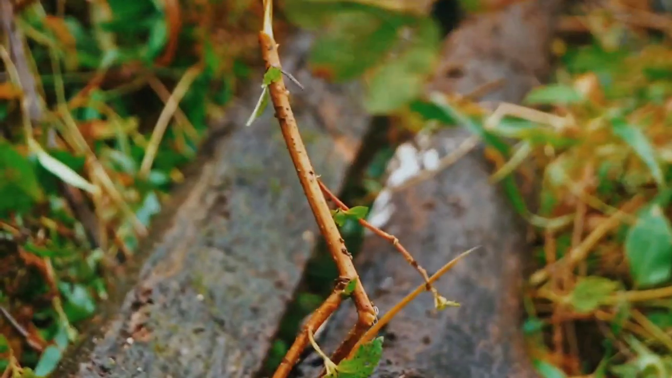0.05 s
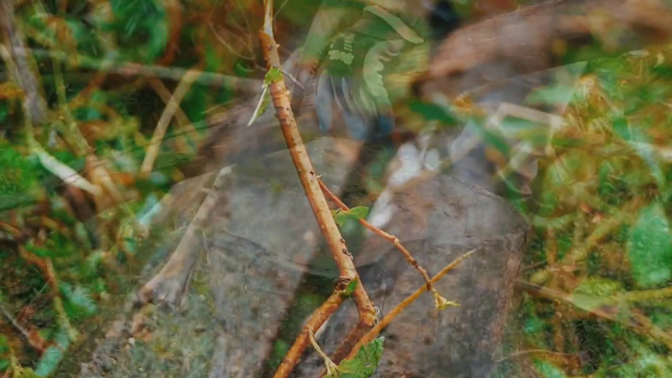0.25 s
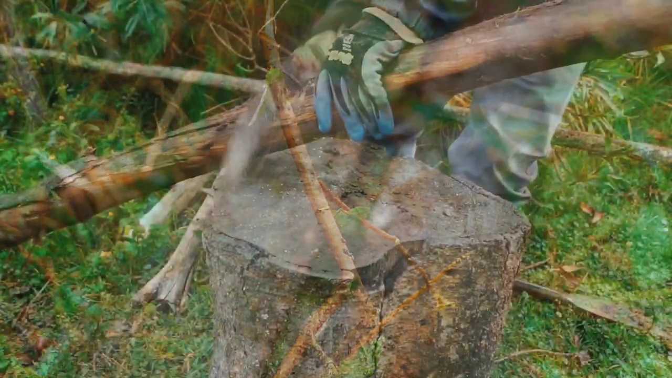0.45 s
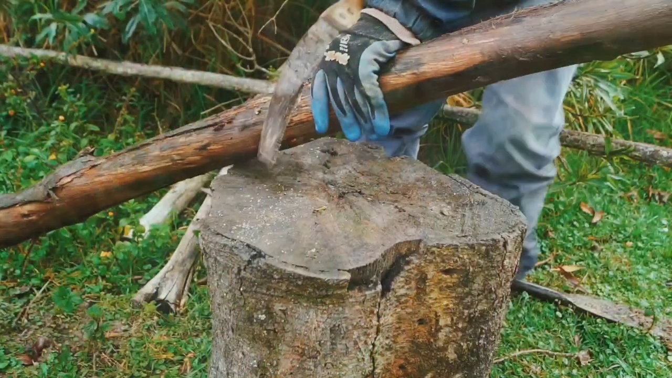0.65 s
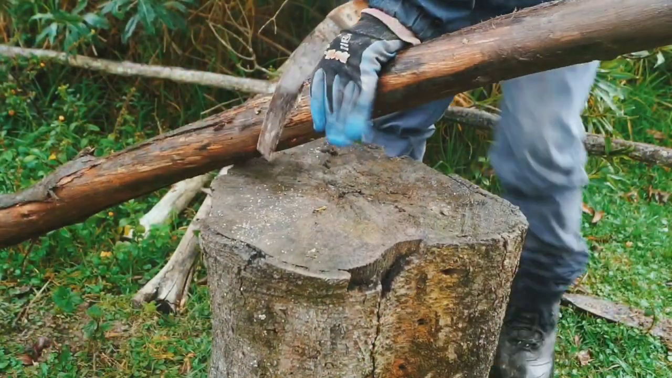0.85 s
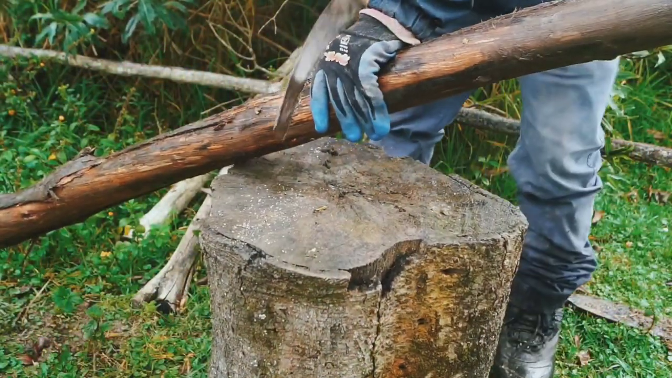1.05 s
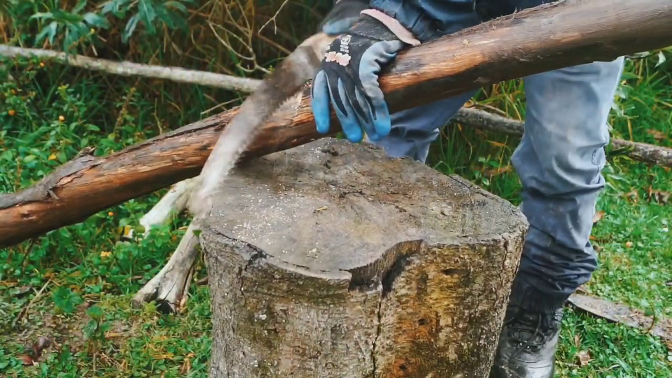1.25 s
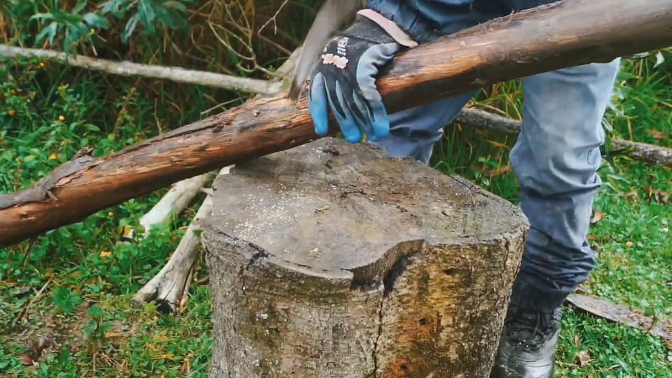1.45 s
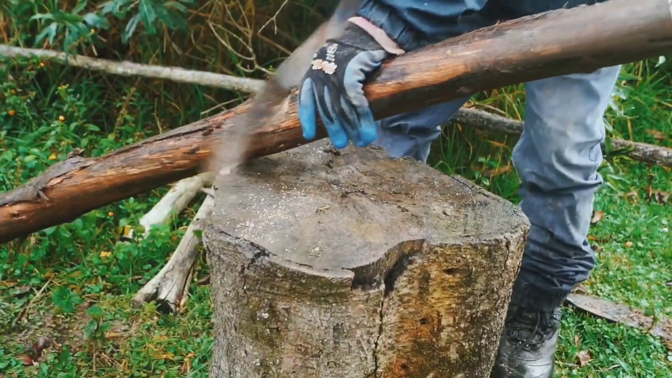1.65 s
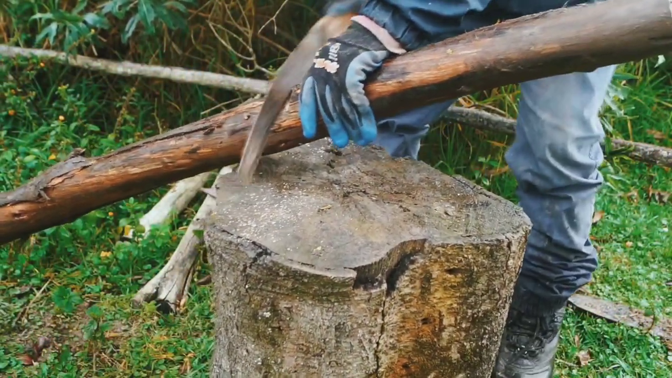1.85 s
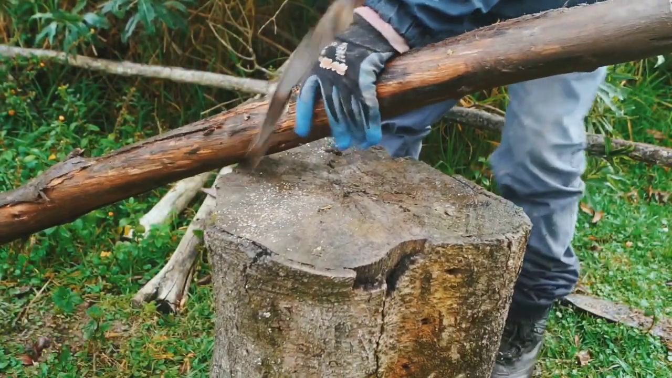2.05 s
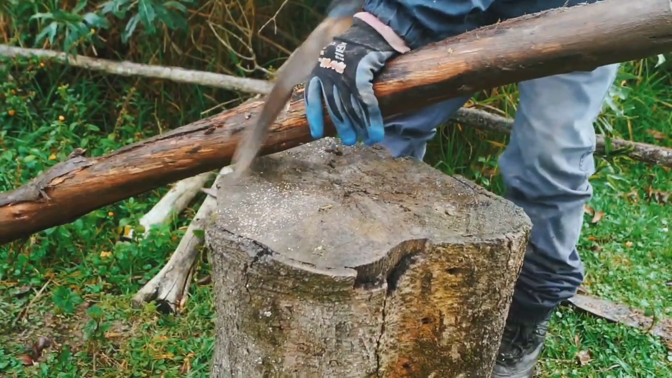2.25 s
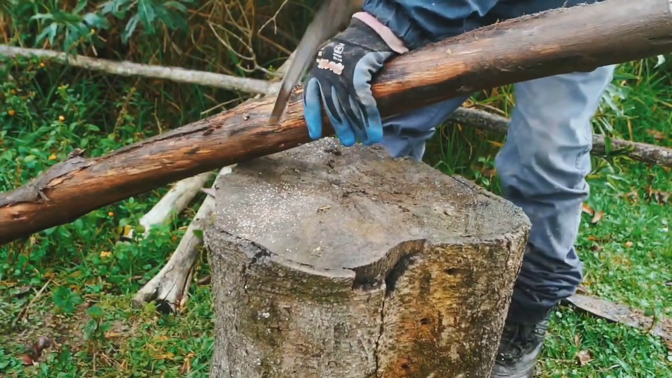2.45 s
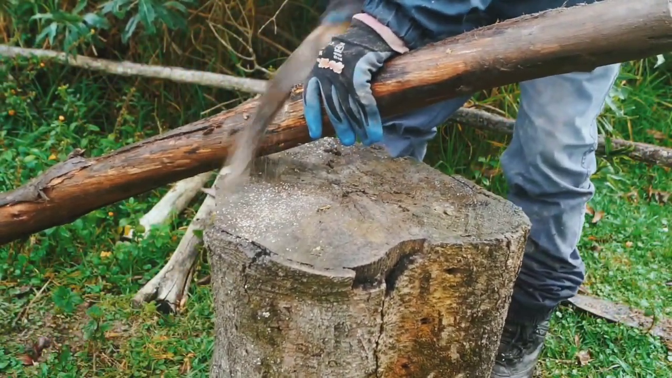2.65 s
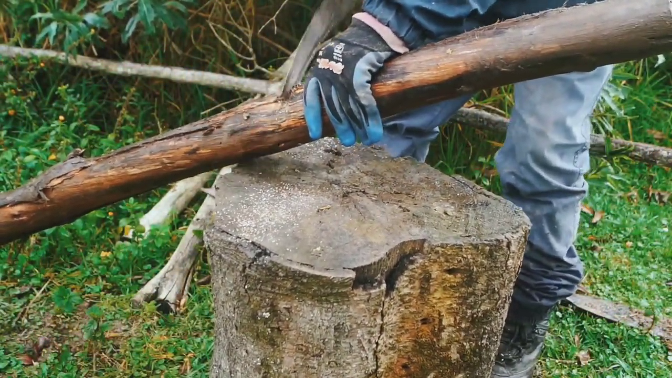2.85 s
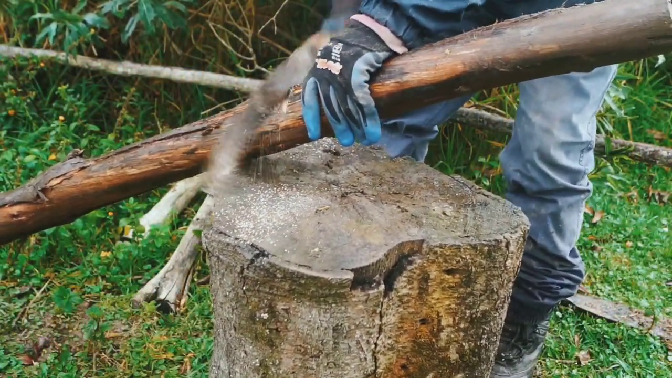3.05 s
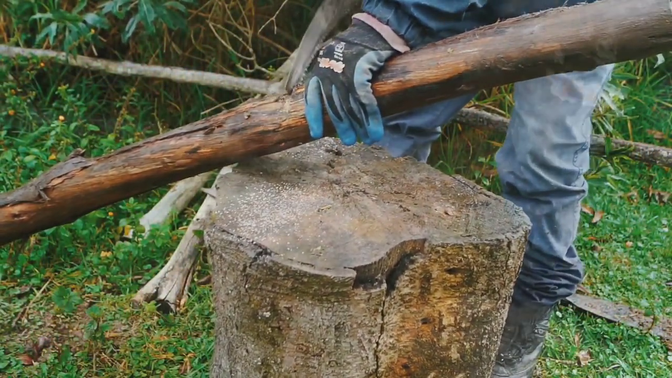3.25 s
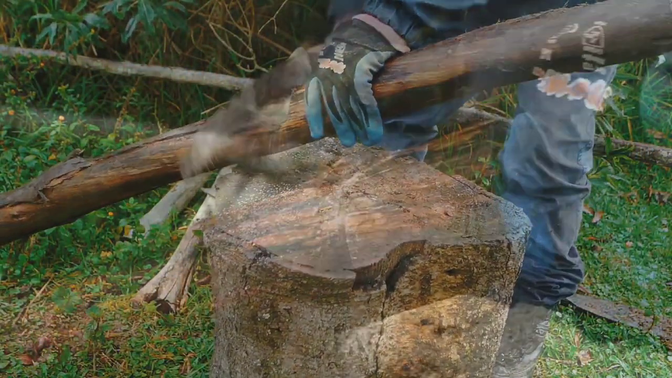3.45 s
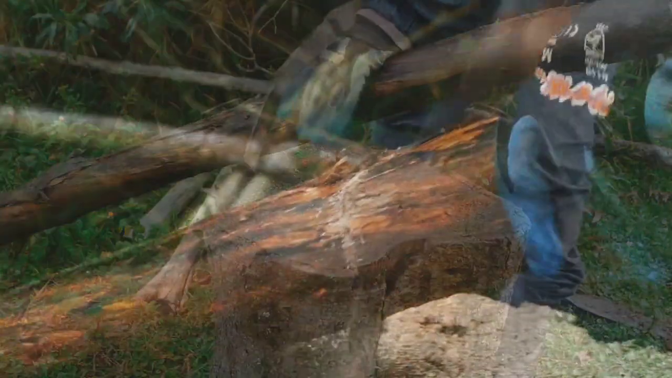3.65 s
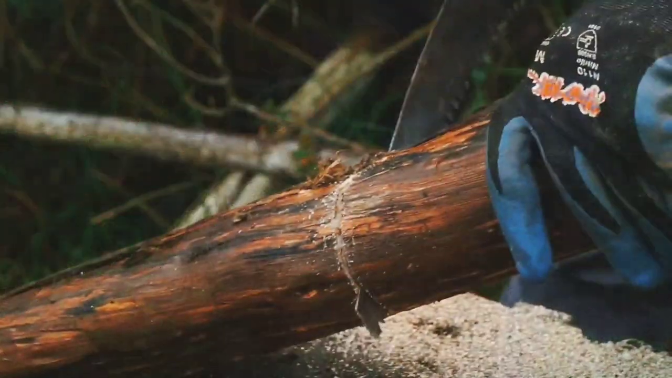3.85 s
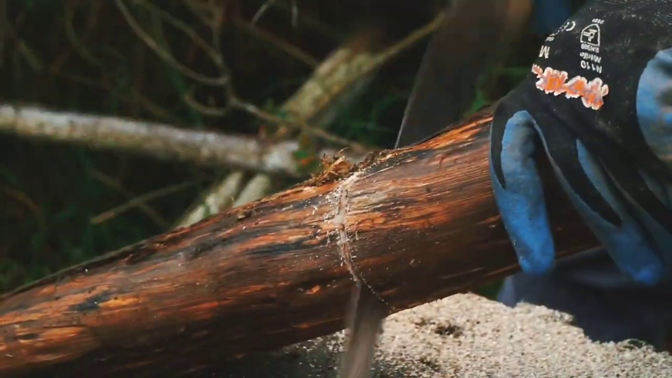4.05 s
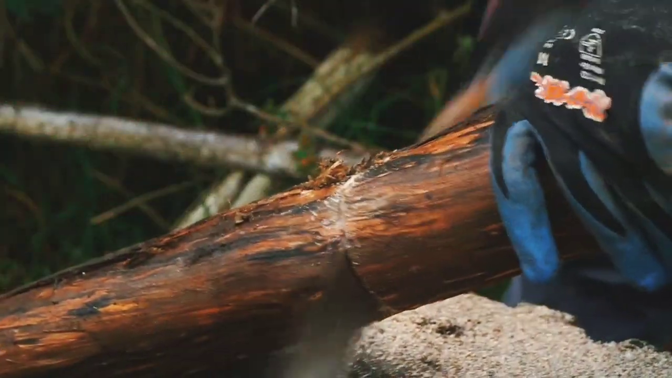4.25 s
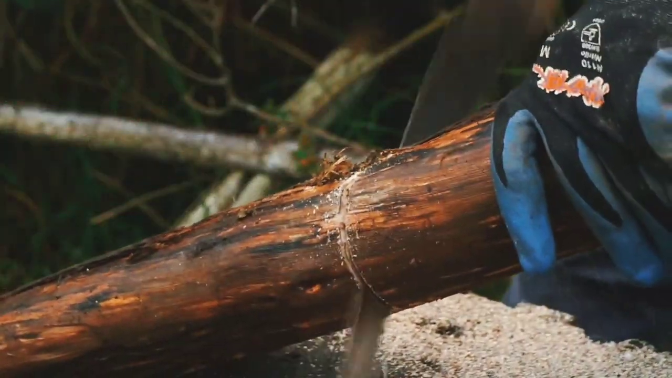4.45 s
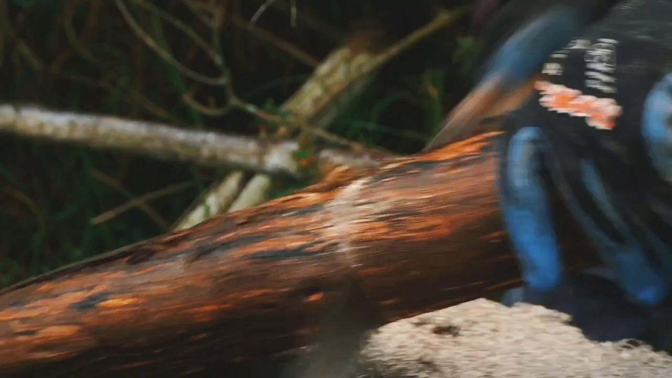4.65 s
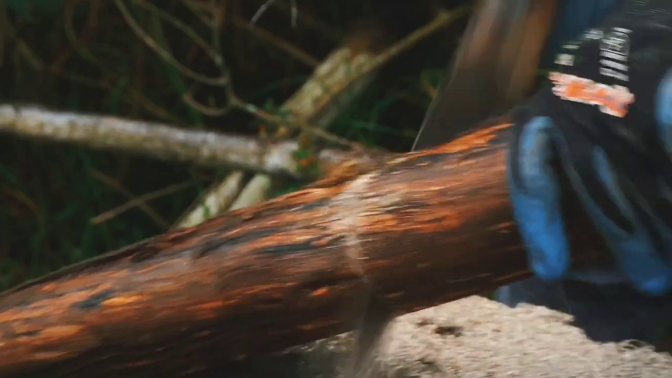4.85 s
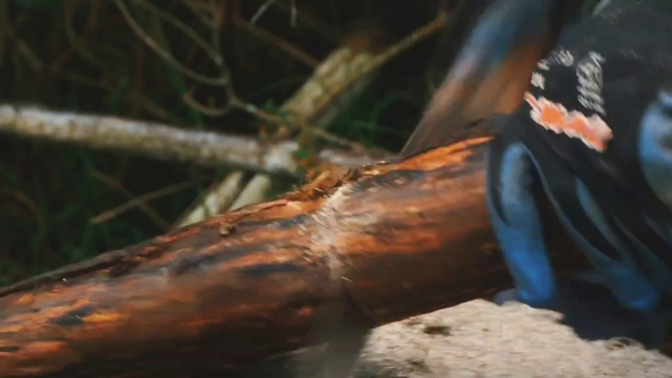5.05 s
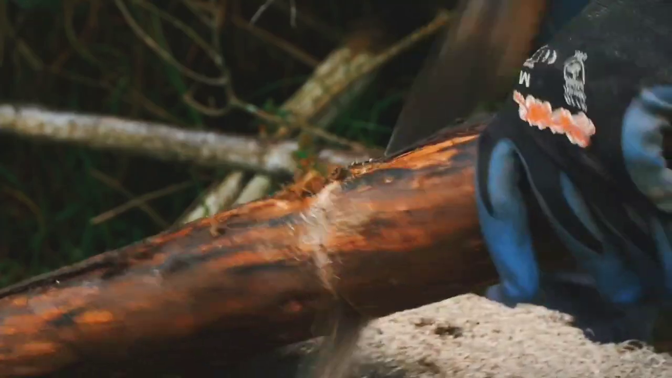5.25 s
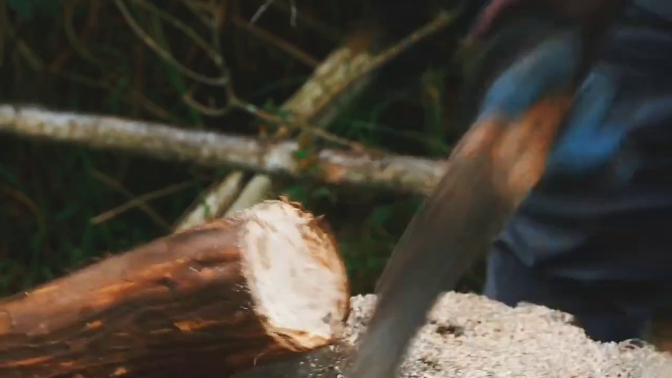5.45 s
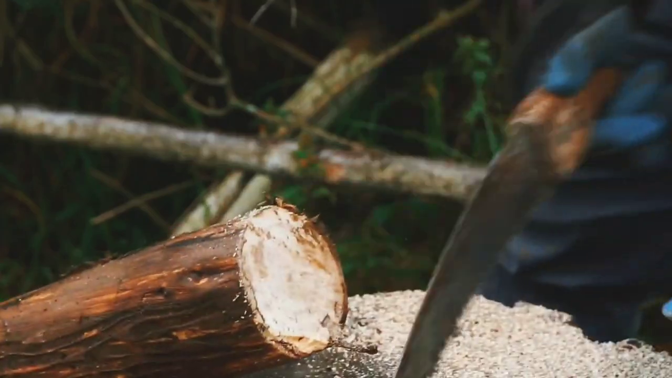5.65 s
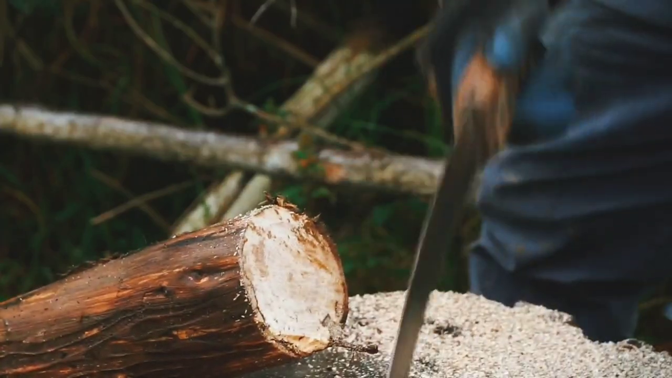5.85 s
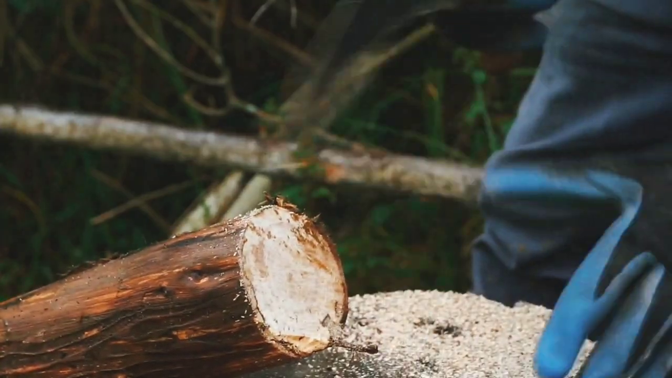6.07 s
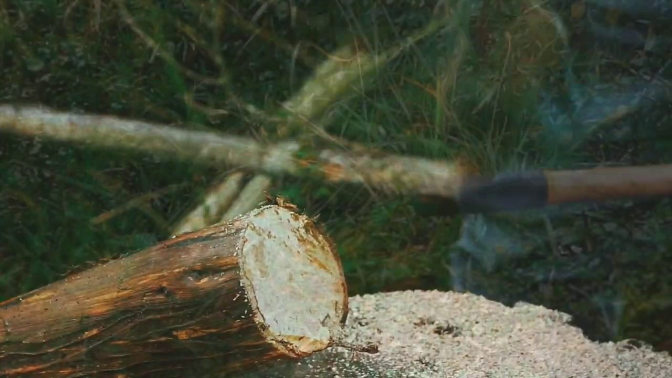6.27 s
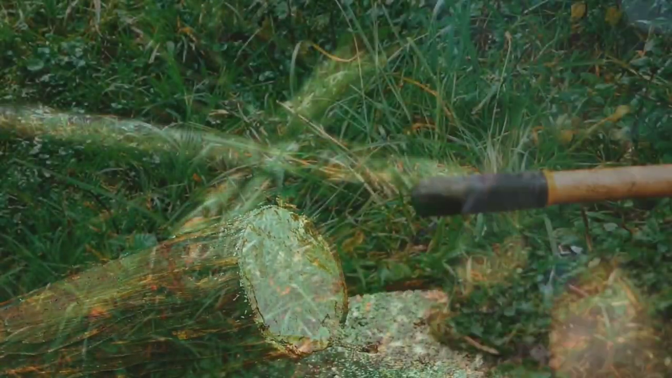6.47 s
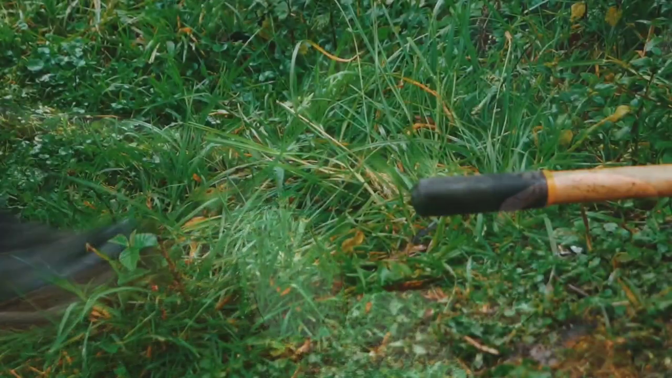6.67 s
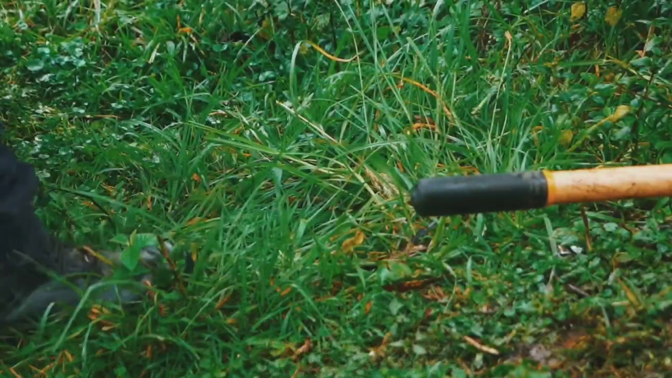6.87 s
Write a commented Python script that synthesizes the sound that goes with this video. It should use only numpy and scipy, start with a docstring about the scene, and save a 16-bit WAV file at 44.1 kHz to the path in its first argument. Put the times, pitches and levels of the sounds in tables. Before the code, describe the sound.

Close, dry sawing of wood in quick even strokes, a short gap, brighter firmer strokes, a sharp snap and soft rustling over faint leafy hiss.

```python
"""A hand saw cuts a thin log outdoors: light starting strokes, quick even strokes, a pause, harder strokes with
another ring and colour, then the end breaks off and drops into the grass. Leaves and far water hiss behind.
Random bites of the teeth excite the modes of log and blade; knocks are damped sines, snaps dying noise bursts.
Two close microphone ports hear the saw nearly in opposite phase below 6 kHz; the hiss is filtered noise."""
import sys
import numpy as np
from scipy import signal
from scipy.fft import rfft, irfft, next_fast_len
from scipy.io import wavfile

SR = 44100
rng = np.random.default_rng(int(sys.argv[2]) if len(sys.argv) > 2 else 0)


def transcribe(signal):
    """Save signal, clipped to [-1, 1], as a 16-bit WAV file at the path in sys.argv[1]."""
    frames = np.atleast_2d(signal).T
    limited = np.clip(frames, -1, 1)
    pcm = np.round(limited * 32767).astype(np.int16)
    wavfile.write(sys.argv[1], SR, pcm)


def to_linear_factor(level_db):
    """Convert decibel levels (scalar or array-like) to linear amplitude factors."""
    exponent = np.asarray(level_db, float) / 20
    return 10 ** exponent


N = 304646
TOP_HZ = 11090   # upper limit of the sound

# Colour of the early strokes and the hits at the two ports. Each row: frequency in Hz, relative level at the
# right port in dB, left over right in dB, phase lead of the left in radians, likeness of the ports (0-1).
EARLY_COLOUR = [(60, -60, -11, 2.1, 0.4), (130, -49.5, 5, 1, 0), (274, -25, 0, 1.7, 0.98),
                (520, -22.5, -0.5, 2.49, 0.98), (1010, -12.5, -2, 2.65, 0.89),
                (1940, -10.5, -2, 2.51, 0.91), (2700, -11.5, -3, 2.3, 0.83), (3550, -16.5, -6, 2.7, 0.56),
                (4570, -26, -4.5, 2.24, 0.63), (5530, -23, -8.5, 1.93, 1), (6200, -23, -8, 0.14, 0.4),
                (7050, -21, -7, 6.7, 1), (8330, -26, -14, 0.04, 0.9), (11250, -23, -11.5, 0.14, 0.1)]


def strokes():
    """Friction power follows blade speed: bite (dB) and its colour per sample, averaged by power in overlaps."""
    # Blade on wood, forward. Each row: start in s, length in s, bite at mid-stroke in dB,
    # lean from start to end in dB, boom of the log against the bite in dB.
    pushes = [(0.02, 0.051, -49.5, -1, -10), (0.305, 0.185, -38, 24, -15.5), (1.029, 0.13, -43, -20, -8.5),
              (1.141, 0.18, -31.5, 21.5, -7.5), (1.548, 0.2, -31, 23, -13),
              (2.049, 0.17, -31.5, 10.5, -6.5), (2.471, 0.17, -28, 6.5, -9),
              (2.882, 0.18, -29.5, 14.5, -8.5), (3.312, 0.22, -32, 15, -9.5),
              (4.052, 0.18, -27.5, -0.5, -15.5), (4.429, 0.17, -28, 21, -13.5),
              (4.822, 0.17, -28.5, 25.5, -12.5), (5.225, 0.24, -27.5, 4, -16)]
    # Blade on wood, backward. Each row: the same columns in the same units as for the pushes.
    pulls = [(0.21, 0.086, -46.5, -9, -3), (0.498, 0.24, -45.5, -19, -10), (1.329, 0.22, -25.5, 0, -20),
             (1.799, 0.27, -33.5, -0.5, -17.5), (2.236, 0.21, -26.5, 0, -14.5),
             (2.658, 0.22, -27, -11.5, -15.5), (3.093, 0.26, -31, -27, -11), (3.534, 0.24, -31, 24, -21),
             (4.215, 0.22, -25, 18, -25.5), (4.618, 0.21, -25.5, -7, -18), (4.974, 0.23, -24.5, 12.5, -28),
             (5.418, 0.118, -28.5, 3, -13)]
    # Colour along a push. Each row: share of the stroke (0-1), boom added in dB, blade hiss against the bite
    # in dB, ring of the log (0-2), brightness in dB per octave.
    along_push = [(0.0, 0.5, -13.5, 1.6, 1.5), (0.35, -0.3, -7.5, 0.97, 0), (0.65, -0.5, -4.5, 1.08, 2.5),
                  (1.0, 4.5, -5.5, 0.9, 0)]
    # Colour along a pull. Each row: the same columns in the same units as along a push.
    along_pull = [(0.0, -8.5, -9.5, 1.6, -0.4), (0.35, -0.5, -6.5, 0.88, 1.2), (0.65, -0.5, -8, 1.2, 0.85),
                  (1.0, 2, -13, 1.4, -2.5)]
    # The loose log rubs and rustles as it settles. Each row: time in s, rub in dB, dry rustle against it in dB.
    settling = [(5.37, -58, -3), (5.39, -40, -1.5), (5.52, -41, -4), (5.59, -48, -6), (5.7, -49.5, -1),
                (5.76, -49, -1.5), (5.785, -43, 4), (5.815, -51, -1.5), (5.96, -46, -14), (6.03, -45.5, -5),
                (6.08, -41, 2.5), (6.14, -45, -1.5), (6.3, -51, -6), (6.43, -47.5, -1), (6.5, -70, -3)]
    # Colour of the settling. Its values: boom in dB, ring (0-2), brightness in dB per octave.
    settling_colour = (-13.5, 0.9, 1)
    push_law, pull_law = 1.44, 1.33   # bite grows as this power of the speed
    late_from_s, late_by_s = 3.456, 3.58   # ring and colour cross over from the early to the late set
    late_boom_rise_db, late_hiss_db, late_ring = 2.5, 2.5, -0.16   # added in the late strokes
    firm_db, light_bright = -35, 0.13   # light strokes scratch: dB per octave gained per dB below firm
    break_s, let_go_t60_s = 5.378, 0.12   # the end breaks off: the stroke under way dies away
    freed_ring, freed_bright = -0.6, 1.5   # the last stroke rasps over splinters and hardly rings the log

    t = np.arange(N) / SR
    late = np.clip((t - late_from_s) / (late_by_s - late_from_s), 0, 1)
    rub_db, rustle_db = in_time(settling)
    power = to_linear_factor(2 * rub_db) * (t > settling[0][0]) * (t < settling[-1][0]) + 1e-10
    settle_boom_db, settle_ring, settle_bright = settling_colour
    colour = np.array([settle_boom_db * power, rustle_db * power, settle_ring * power, settle_bright * power])
    for rows, along, law in ((pushes, along_push, push_law), (pulls, along_pull, pull_law)):
        at, *columns = np.transpose(along)
        for start, length, db, lean_db, boom_db in rows:
            span = slice(round(start * SR), round((start + length) * SR))
            share, lateness = np.clip((t[span] - start) / length, 0, 1), late[span]
            freed = start > break_s
            speed = np.abs(np.sin(np.pi * share))   # half a sine over the stroke
            own = (to_linear_factor(db + lean_db * (share - 0.5)) * speed ** law) ** 2
            since_break = np.maximum(t[span] - break_s, 0) * (start < break_s)
            own = own * to_linear_factor(-120 / let_go_t60_s * since_break)   # power, hence twice 60 dB
            added = [boom_db + late_boom_rise_db * lateness * (share - 0.5),
                     late_hiss_db * lateness,
                     late_ring * lateness + freed_ring * freed,
                     light_bright * max(firm_db - db, 0) + freed_bright * freed]
            power[span] += own
            colour[:, span] += own * [np.interp(share, at, c) + more for c, more in zip(columns, added)]
    return 10 * np.log10(power), *colour / power, late


def saw(bite_db, boom_db, hiss_db, ring, tilt_db, late):
    """Source and resonator: bites drive the log's boom and ring and the blade's hiss; chips rasp on top."""
    # Early log and blade resonances. Each row: frequency in Hz, width in Hz, relative level in dB.
    early_modes = [(250.7, 24, 3), (421.5, 22, 20), (665, 48, 13.5), (866, 24, 14.5), (1153, 36, 17),
                   (1202, 26, 15.5), (1450, 45, 18.5), (1528, 67, 14), (1726, 72, 4), (2360, 150, -0.5),
                   (3177, 130, 5.5), (4120, 340, 6.5), (5420, 170, 7.5)]
    # Late log and blade resonances. Each row: frequency in Hz, width in Hz, relative level in dB.
    late_modes = [(363, 77, 14.3), (783, 68, 17.8), (835, 60, 15.2), (1055.6, 49, 21.2), (1176, 44, 12.8),
                  (1386, 18.5, 13.8), (1827, 57, 1.2), (2270, 60, 11.3), (2530, 440, 8.2), (3210, 390, 4.9),
                  (5290, 250, 2.3)]
    # Colour of the late strokes at the ports. Each row: frequency in Hz, relative level at the right port in
    # dB, left over right in dB, phase lead of the left in radians, likeness of the ports (0-1).
    late_colour = [(60, -63, -16, 3.17, 0.52), (140, -29.5, -32, 11, 0.13), (274, -16, -1, 2.56, 0.89),
                   (514, -13.5, -0.5, 2.38, 0.84), (960, -8, -1.0, 2.5, 0.93), (1890, -3, -2.5, 2.39, 1),
                   (2950, -10.5, -4.5, 2.5, 0.7), (3870, -9.5, -4.5, 2.36, 0.71),
                   (4520, -27, -9.5, 3.2, 0.19), (5630, -27, -7, 1.7, 1), (6140, -24, -7.5, 0.05, 0.73),
                   (7140, -28, -8.7, 0.01, 0.7), (9240, -24, -13, 0.03, 0.83),
                   (11300, -30.5, -17, 0.48, 0.32)]
    catch = to_linear_factor(1.22 * drift(10.6))
    log = bites(catch, 4000)
    blade = chips(np.sqrt(catch), 0, 4400, 10750, cycles=55, per_s=22000)
    rasp = chips(catch, tilt_db, 600, 4600, cycles=10.8, per_s=6500)
    hz, out = padded_grid()[1], 0
    low = 1 / np.sqrt(1 + (hz / 560) ** 8)
    high = 1 / np.sqrt(1 + (4600 / hz) ** 8) * (hz < TOP_HZ)
    middle = np.sqrt(np.clip(1 - low ** 2 - high ** 2, 0, 1)) * (hz < TOP_HZ)
    rasp_band = middle * ((hz > 600) & (hz < 4600))
    ring_share = np.clip(ring, 0, 2) / 2   # of the power; the rasp has the rest
    for share, colour, modes in ((1 - late, EARLY_COLOUR, early_modes), (late, late_colour, late_modes)):
        push = to_linear_factor(bite_db) * np.sqrt(share)
        body = resonances(modes)
        rung = ringing(log * push * np.sqrt(ring_share), modes, tilt_db)
        out = out + ports(colour, *log * push * to_linear_factor(boom_db), low * (1 + body))
        out = out + ports(colour, *blade * push * to_linear_factor(hiss_db), high * (1 + body))
        out = out + ports(colour, *rung, middle, given=body)
        out = out + ports(colour, *rasp * push * np.sqrt(1 - ring_share), rasp_band)
    return out


def bites(catch, per_s):
    """Shot noise: teeth tear fibres in uneven clicks, clumped as the blade catches and frees; two unrelated draws."""
    spread_db = -np.minimum(rng.exponential(1, (2, N)), 3)
    sizes = to_linear_factor(spread_db) * rng.standard_normal((2, N))
    return rms_one(sizes * (rng.random((2, N)) < per_s / SR) * catch)


def chips(catch, tilt_db, low_hz, high_hz, cycles, per_s):
    """Damped oscillators: each bite rings at one of 18 pitches, losing 60 dB in `cycles`; about white in sum."""
    clicks, dealt, out = bites(catch, per_s), rng.integers(0, 18, (2, N)), 0
    tilt_db = tilt_db + np.zeros(N)
    for k, hz in enumerate(np.geomspace(low_hz, high_hz, num=18)):
        r, w = to_linear_factor(-60 * hz / (cycles * SR)), 2 * np.pi * hz / SR
        port, at = np.nonzero((dealt == k) & (clicks != 0))
        gain = to_linear_factor(tilt_db[at] * np.log2(hz / 1400) + 2.5 * drift(17.5)[at])
        force = np.full((2, N), 1e-18)
        force[port, at] = clicks[port, at] * hz * gain
        out = out + signal.lfilter([0, np.sin(w)], [1, -2 * r * np.cos(w), r * r], force)
    return rms_one(out) * np.sqrt((high_hz - low_hz) / (SR / 2))


def ringing(force, modes, tilt_db):
    """Modal excitation: the contact point moves along the blade and favours now one mode, now another."""
    sway_db, sway_hz = 2.9, 8
    out, acting = np.zeros_like(force), np.flatnonzero(force.any(axis=0))
    live = slice(acting[0], acting[-1] + SR // 4)
    for k, (hz, width, db) in enumerate(modes):
        r, w = np.exp(-np.pi * width / SR), 2 * np.pi * hz / SR
        gain = to_linear_factor(db + sway_db * drift(sway_hz)[live] + tilt_db[live] * np.log2(hz / 1400))
        feed = [(1 - r * r) / 2, 0, (r * r - 1) / 2]
        back = [1, -2 * r * np.cos(w), r * r]
        out[:, live] += (-1) ** k * signal.lfilter(feed, back, force[:, live] * gain + 1e-18)
    return out


def resonances(modes):
    """Modal superposition: summed frequency response of damped modes with alternating sign."""
    hz, total = padded_grid()[1], 0
    for k, (mode_hz, width, db) in enumerate(modes):
        damping = 1j * hz * width
        total = total + (-1) ** k * to_linear_factor(db) * damping / (mode_hz ** 2 - hz ** 2 + damping)
    return total


def knocks():
    """Impact excitation: wood on wood rings the log's low modes; harder knocks favour the higher ones."""
    # Wood on wood. Each row: time in s, relative level in dB, hardness in dB per octave.
    blows = [(0.116, -19.5, 1.5), (0.125, -28, -5), (0.152, -34, -2), (0.209, -19, 3.5), (0.218, -32, 3),
             (4.955, -28, -8), (4.976, -22, -8), (5.306, -22, 2), (5.3855, -13.5, 2.5), (5.392, -17.5, -4),
             (5.418, -18, 3)]
    # Modes that a knock rings. Each row: frequency in Hz, relative level in dB, decay by 60 dB in s.
    knock_modes = [(370, -7, 0.06), (623, 8.5, 0.018), (770, 4.5, 0.014), (1090, -5, 0.023),
                   (1670, -10, 0.018)]
    out, t = np.zeros(N + SR), np.arange(SR // 5) / SR
    rise = 1 - np.exp(-t / 0.0012)   # wood meets wood softly
    for (s, db, hard_db), luck in zip(blows, rng.normal(0, 0.47, (len(blows), len(knock_modes)))):
        for (mode_hz, mode_db, t60), own_db in zip(knock_modes, luck):
            level = to_linear_factor(db + mode_db + own_db + hard_db * np.log2(mode_hz / 700) - 60 * t / t60)
            out[round(s * SR):][:len(t)] += rise * level * np.sin(2 * np.pi * mode_hz * t)
    # the knocks carry little bass
    return signal.sosfilt(signal.butter(2, 330, "high", fs=SR, output="sos"), out)


def thuds():
    """Heavily damped impact: the sawn-off end meets the ground in soft low bumps of two partials."""
    # The sawn-off end meets the ground. Each row: time in s, relative level in dB, upper partial in Hz.
    bumps = [(5.373, -44, 282), (5.692, -42, 225), (5.775, -39, 230)]
    out, t = np.zeros(N + SR), np.arange(SR // 5) / SR
    for s, db, thud_hz in bumps:
        envelope = (1 - np.exp(-t / 0.0017)) * to_linear_factor(db - 60 * t / 0.045)
        partials = np.sin(2 * np.pi * thud_hz * t) + 0.49 * np.sin(2 * np.pi * 0.44 * thud_hz * t)
        out[round(s * SR):][:len(t)] += envelope * partials
    return out


def snaps():
    """Brittle fracture: fibres and twigs snap as short dying noise bursts around their own pitch."""
    # Fibres and twigs. Each row: time in s, relative level in dB, centre in Hz, crackle against the band in dB.
    cracks = [(0.2773, -28, 1210, -3), (0.597, -26, 1940, -22), (0.625, -22, 2300, -18),
              (0.654, -22, 1510, -18), (0.673, -21, 1450, -20), (0.9099, -18, 1300, -12),
              (0.924, -22, 1230, -20), (4.0924, -25, 2320, -18), (4.6393, -22, 1450, -18),
              (5.018, -21, 1570, -18), (5.2985, -8, 1500, -18), (5.302, -11, 2420, -15),
              (5.412, -7.5, 1890, -22), (5.622, -23, 1870, -20), (5.692, -21, 2070, -12),
              (5.776, -17.5, 2330, -9), (6.0788, -25, 1490, -9), (6.1698, -23, 1510, -2),
              (6.3293, -29, 1300, -8), (6.4284, -32, 1950, -5)]
    rise_s, t60_s = 0.0016, 0.041
    out, t = np.zeros(N + SR), np.arange(SR // 5) / SR
    top = signal.butter(2, 7300, "high", fs=SR, output="sos")
    for (s, db, centre_hz, crackle_db), noise in zip(cracks, rng.standard_normal((len(cracks), len(t)))):
        edges_hz = [centre_hz / 1.97, centre_hz * 2 ** 0.71]
        band = signal.butter(2, edges_hz, "band", fs=SR, output="sos")
        pitched = rms_one(signal.sosfilt(band, noise))
        crackle = to_linear_factor(crackle_db) * rms_one(signal.sosfilt(top, noise))
        envelope = (1 - np.exp(-t / rise_s)) * to_linear_factor(db - 60 * t / t60_s)
        out[round(s * SR):][:len(t)] += (pitched + crackle) / 2 * envelope
    return out


def hits():
    """Superposition: knocks, thuds and snaps reach the ports with the early phase and level differences."""
    out = knocks() + thuds() + snaps()
    out = signal.sosfilt(signal.butter(2, 70, "high", fs=SR, output="sos"), out)
    flat = [(hz, 0, left_db, lead, 1) for hz, db, left_db, lead, alike in EARLY_COLOUR]
    return ports(flat, out[:N], np.zeros(N))


def woods(bite_db):
    """Diffuse noise: a wide hiss flickers and swells as trees scatter the saw back; its bass lumps with the wind."""
    # Colour of the woods. Each row: frequency in Hz, relative level at the right port in dB,
    # left over right in dB, phase lead of the left in radians, likeness of the ports (0-1).
    woods_colour = [(57, -32, -5.5, 0.92, 0.26), (129, -18, 2, 3.2, 0.11), (245, -9.5, 0.7, 1.6, 1),
                    (453, -1, -1, 2.95, 0.53), (980, 6, -0.3, 3.09, 0.87), (1960, -2.5, 0, 3.98, 0.78),
                    (2870, -4.5, 1.5, 3.3, 0.65), (3750, -7.5, 2, 4.64, 0.84), (4740, -6, 0.5, 2.8, 0.15),
                    (5600, -12, 5.5, 1.9, 0.2), (5700, -9.5, 2.5, 4.9, 0.95), (6660, -9, 1, 11.5, 1),
                    (8700, -11.5, 3, 0.03, 0.55), (11100, -15, 2, 6.28, 0.54)]
    # Strength of the breeze. Each row: time in s, level in dB.
    breeze = [(0.0, -47.5), (0.6, -46), (1.2, -44.5), (2.3, -45.5), (3.8, -45.5), (5.2, -44), (6.0, -44.5),
              (6.5, -48.5), (6.91, -46)]
    leaf_hiss_db, leaf_hiss_follows = -51.5, 0.43   # treble at mean breeze; share of the breeze's swing
    echo_db, echo_treble_db, echo_t60_s = -21.5, -23.5, 0.2

    breeze_db, = in_time(breeze)
    r = to_linear_factor(-120 / (echo_t60_s * SR))
    echo = signal.lfilter([1 - r], [1, -r], to_linear_factor(2 * bite_db))   # power of the scattered saw
    leaf_db = leaf_hiss_db + leaf_hiss_follows * (breeze_db - breeze_db.mean())
    body_db = 10 * np.log10(to_linear_factor(2 * breeze_db) + to_linear_factor(2 * echo_db) * echo)
    treble_db = 10 * np.log10(to_linear_factor(2 * leaf_db) + to_linear_factor(2 * echo_treble_db) * echo)
    hz = padded_grid()[1]
    bass, treble = 1 / (1 + (hz / 220) ** 6), 1 / (1 + (3500 / hz) ** 4)   # shares of power
    middle = np.clip(1 - bass - treble, 0, 1)
    noise = rng.standard_normal((6, N))
    flicker_db = 1.1 * drift(5.0)
    hiss_gain = to_linear_factor(treble_db + flicker_db + 1.6 * drift(13.6))
    lumps = to_linear_factor(breeze_db - 26 + 5.5 * drift(3.5))
    body = ports(woods_colour, *noise[:2] * to_linear_factor(body_db + flicker_db), np.sqrt(middle))
    hiss = ports(woods_colour, *noise[2:4] * hiss_gain, np.sqrt(treble) * (hz < TOP_HZ))
    wind = ports(woods_colour, *noise[4:] * lumps, np.sqrt(bass))
    return body + hiss + wind


def ports(table, near, other, shape=1, given=1):
    """Partial coherence: both ports hear `near`, the left one shifted in phase and mixed with unrelated `other`.
    The gain is set so that input with the spectrum `given` has rms 1 in the mean of the ports."""
    size, hz = padded_grid()
    at, level_db, left_db, lead, alike = np.transpose(table)
    columns = (level_db, left_db, np.clip(alike, 0, 1), np.cos(lead), np.sin(lead))
    level_db, left_db, alike, re, im = [np.interp(np.log(hz), np.log(at), c) for c in columns]
    right = to_linear_factor(level_db) * shape
    same = to_linear_factor(left_db) * alike * np.exp(1j * np.arctan2(im, re))
    apart = to_linear_factor(left_db) * np.sqrt(1 - alike ** 2)
    mean_power = np.mean(abs(right * given) ** 2 * (abs(1 + same) ** 2 + apart ** 2) / 4)
    right = right / np.sqrt(mean_power)
    near, other = rfft([near, other], size)
    return irfft([right * (same * near + apart * other), right * near], size)[:, :N]


def padded_grid():
    """Zero padding against circular convolution: length and frequencies of the transform."""
    size = next_fast_len(N + 8192)
    return size, np.arange(size // 2 + 1) * SR / size + 1e-3


def drift(rate_hz):
    """Low-passed noise: slow chance with spread 1 from a double pole at rate_hz, drawn every 32nd sample."""
    r = np.exp(-64 * np.pi * rate_hz / SR)
    slow = signal.lfilter([1], [1, -2 * r, r * r], rng.standard_normal(N // 32 + 402))[400:]
    return np.interp(np.arange(N) / 32, np.arange(len(slow)), rms_one(slow))


def in_time(rows):
    """Linear interpolation: columns of a curve at every sample."""
    s, *columns = np.transpose(sorted(rows))
    return [np.interp(np.arange(N) / SR, s, c) for c in columns]


def rms_one(x):
    """Normalisation to unit mean power."""
    return x / np.sqrt(np.mean(x ** 2) + 1e-20)


def scene():
    """Superposition of saw, hits and woods; the strokes also feed the echo."""
    blade = strokes()
    return saw(*blade) + hits() + woods(blade[0])


def top_cut(x):
    """Nothing passes above the cut-off."""
    return signal.sosfilt(signal.butter(12, 12180, fs=SR, output="sos"), x)


def record(dry):
    """Saturation and band limiting: only the highest peaks are rounded; the top is cut steeply."""
    size, hz = padded_grid()
    rounded = dry / (1 + (dry / 0.9) ** 6) ** (1 / 6)
    finished = irfft(rfft(rounded, size) * (hz < TOP_HZ), size)[:, :N]
    return top_cut(finished)


dry = scene()
out = record(dry)
transcribe(out)
```